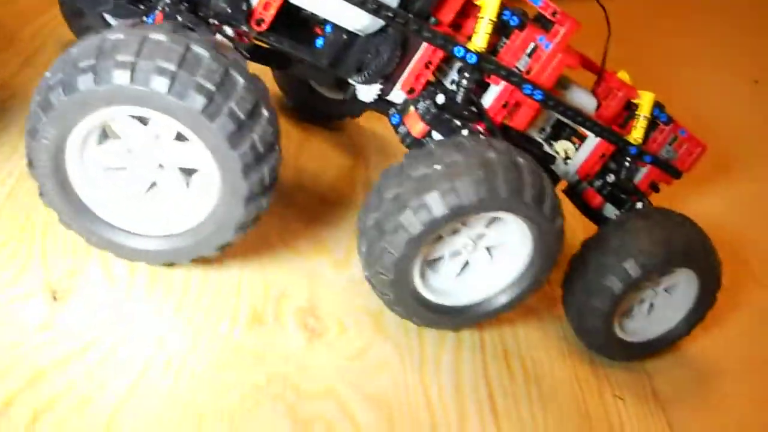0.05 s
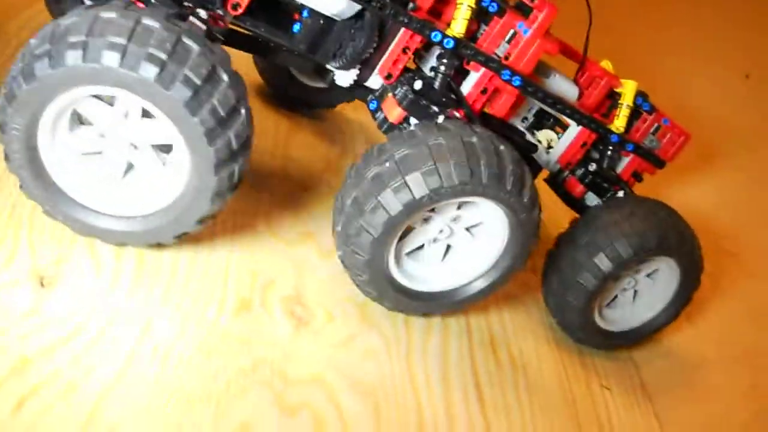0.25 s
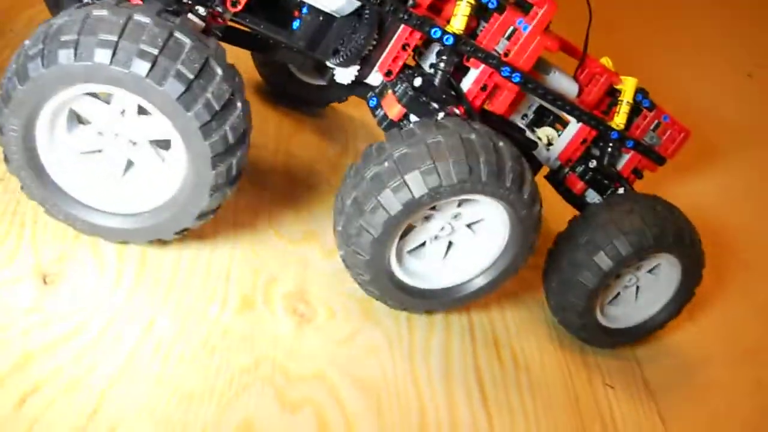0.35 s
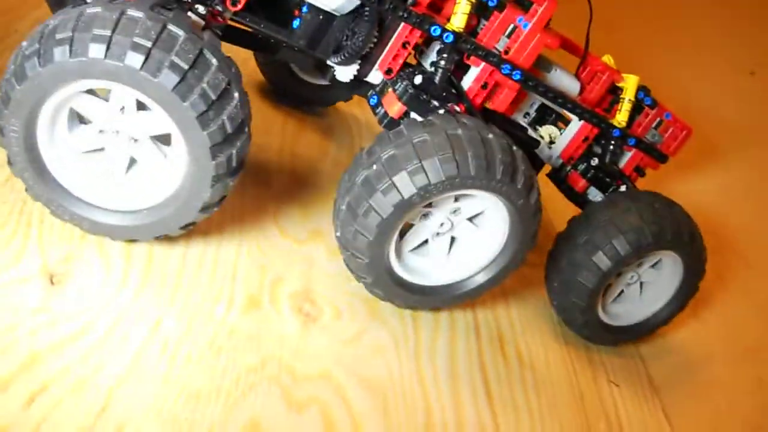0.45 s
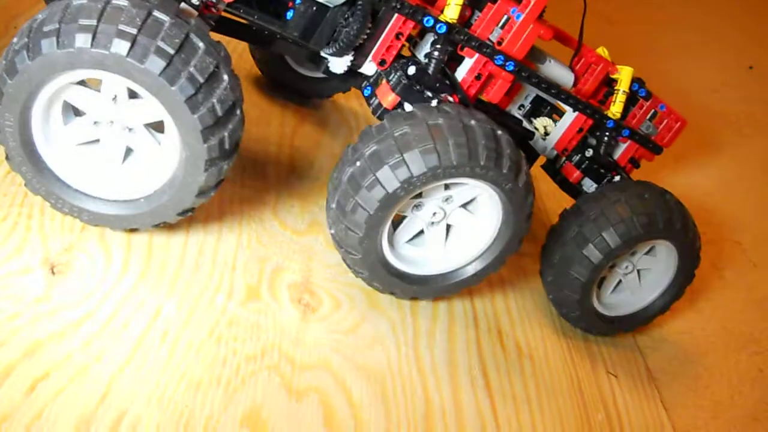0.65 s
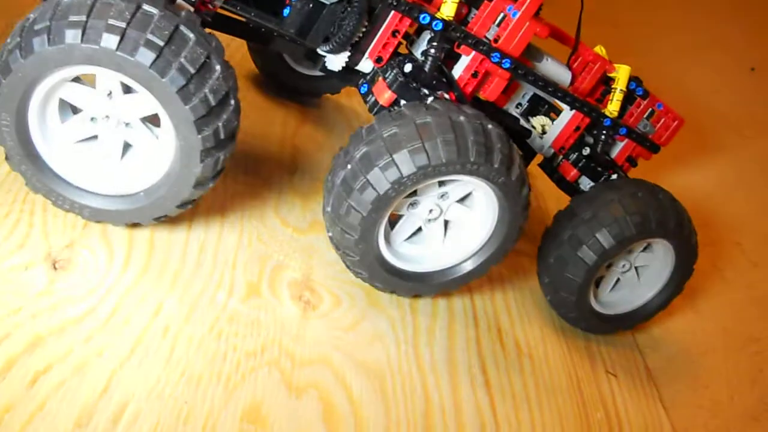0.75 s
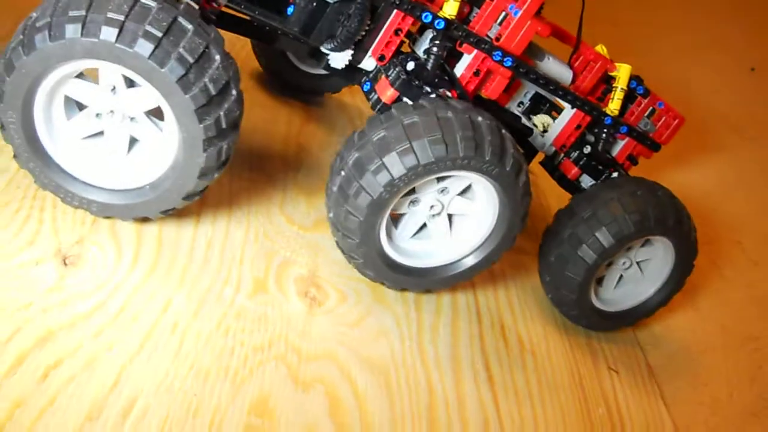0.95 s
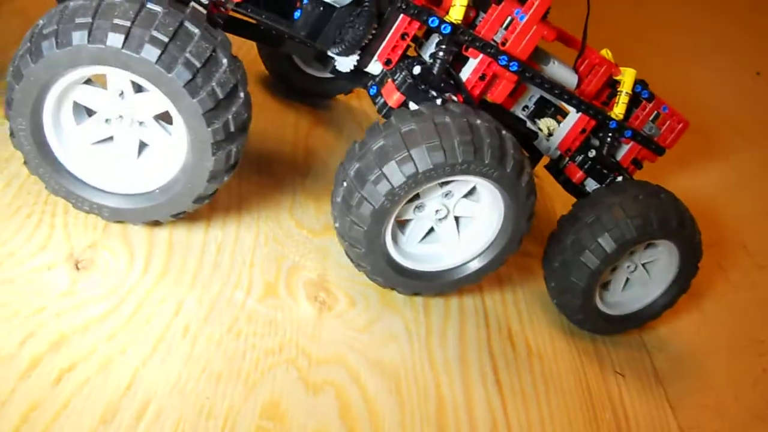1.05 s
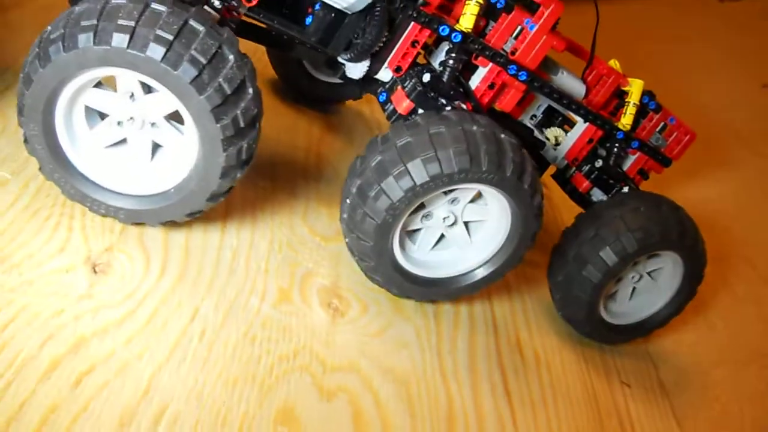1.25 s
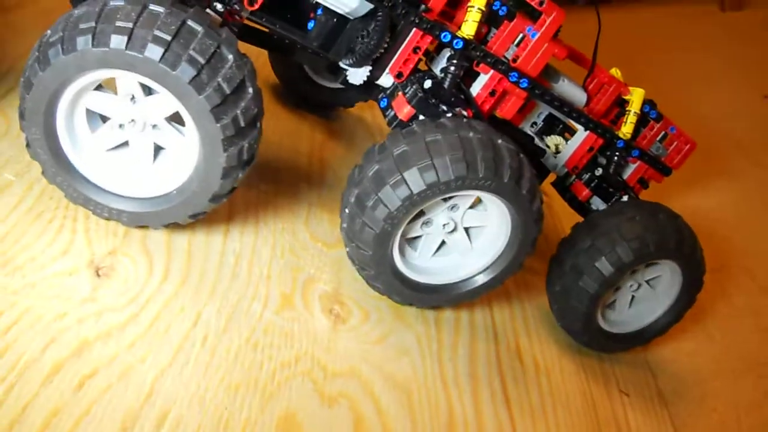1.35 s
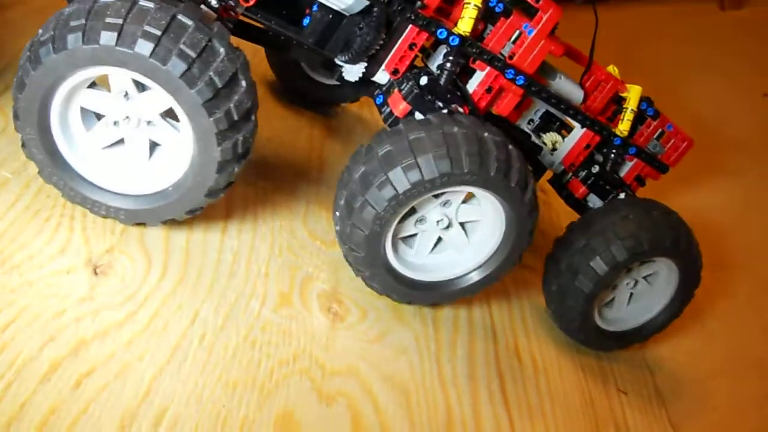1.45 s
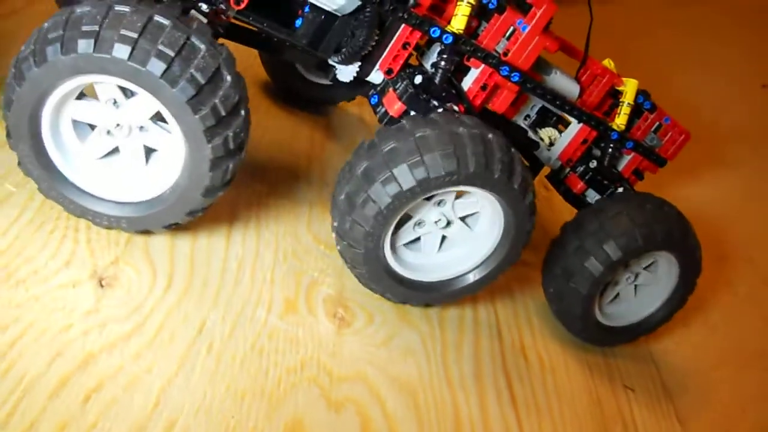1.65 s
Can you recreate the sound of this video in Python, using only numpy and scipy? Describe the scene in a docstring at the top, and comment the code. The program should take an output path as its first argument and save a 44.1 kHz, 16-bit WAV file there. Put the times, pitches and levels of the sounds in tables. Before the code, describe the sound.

Sharp, evenly spaced clicks come from a toy truck's slipping plastic gears, heard up close indoors. Its quieter motor whirs throughout, briefly slowing, while the chassis knocks and finally settles with a dull tap.

```python
"""A brief scuff and a whirring motor: a toy truck strains on a wooden floor, very close by.
Its shaft hums and its gears rub and tick. About five times a second a jammed plastic gear jumps
a tooth with a sharp snap, the loudest sound here, and the frame knocks as it shifts.
The rubber tyres thud and groan softly, and a small room answers each click over a faint rumble."""
import sys
import numpy as np
from scipy import signal
from scipy.fft import rfft, irfft
from scipy.io import wavfile
from scipy.ndimage import uniform_filter1d

SR = 44100
rng = np.random.default_rng(int(sys.argv[2]) if len(sys.argv) > 2 else 0)


def persist_wave(psi):
    """Save psi, clipped to +-1, as 16-bit WAV."""
    counts = np.round(np.clip(psi, -1, 1) * 32767).astype(np.int16)
    wavfile.write(sys.argv[1], SR, np.atleast_2d(counts).T)


N = 74970

# Levels are relative. A t60 is the time a sound takes to fade by 60 dB.
# gear teeth jumping: t/s, level/dB, pitch ratio, jolt level/dB
SNAPS = [(0.244, 1.5, 0.97, -2.5), (0.4511, 0.5, 0.96, 5), (0.6642, -0.5, 1.0, -19), (.8731, -0.5, 0.97, 6),
         (1.0607, -.5, 0.95, -4.5), (1.2675, -1.8, 1.0, 10.5)]
# the gear's ringing tones, before each snap's pitch ratio: f/Hz, level/dB, t60/s
GEAR_MODES = [(2843, -29.5, 0.029), (3724, -26.5, 0.022), (4480, -27, 0.0075), (5294, -5.5, 0.0056),
              (5473, -7, 0.01), (6017, -1, 0.0066), (6920, -14.5, 0.013), (8520, -2, 0.0036),
              (9150, -10.5, 0.0041)]
# the crack rattling on through the beams: f/Hz, level/dB
CRACK_SPECTRUM = [(100, -24.5), (400, -6.5), (900, -4.5), (1500, -11), (2200, -12), (3500, -12), (5500, 5),
                  (8000, 1), (10000, -3.5), (12500, -33.5)]
# the jolt each snap gives the chassis: f/Hz, level/dB
JOLT_SPECTRUM = [(60, 1), (300, -6), (600, -0.5), (1000, 4), (1700, -18), (2600, -29), (5000, -19),
                 (12000, -39)]
# the frame knocking: t/s, ring level/dB, clack level/dB
KNOCKS = [(.4102, -0.5, 3), (.9697, -5.5, -2.5), (1.4414, -4.5, -3.5)]
# the frame's ringing tones, before its pitch ratio: f/Hz, level/dB, t60/s
FRAME_MODES = [(486, -8.5, 0.019), (567, 6, 0.028), (661, -2.5, 0.051), (1373, -5, 0.031),
               (1702, 1.5, 0.015), (2120, -19, .012)]
# the clack of loose beams: f/Hz, level/dB
CLACK_SPECTRUM = [(150, -25.5), (600, -3.5), (1100, -8.5), (2400, -6.5), (3700, 0), (5500, 3.5), (7800, 4),
                  (10000, 2), (12500, -26)]
# the dull tones of the settling chassis: f/Hz, level/dB, t60/s
SETTLE_MODES = [(125, -2, 0.078), (307, -6, 0.04), (950, -4, 0.033), (1190, 0.5, 0.026), (1800, 0.5, .016),
                (2250, -6, .016)]
# turns of the motor shaft per second: t/s, f/Hz
SHAFT_SPEED = [(0, 84.5), (.17, 84.5), (.3, 79.55), (.45, 69.8), (.62, 63.4), (.70, 87.2), (1.0, 87.84),
               (1.42, 86.7), (1.48, 78.4), (1.56, 87.5), (1.7, 84.3)]
# how loud the motor runs: t/s, hum level/dB, whir level/dB
MOTOR_LEVELS = [(0, -67, -45.5), (.07, -54.5, -47.5), (.2, -55, -45.5), (.36, -57, -48.5), (.55, -61, -49),
                (.75, -58.5, -51), (1.0, -58, -50.5), (1.2, -59.5, -52), (1.4, -58, -51), (1.7, -59.5, -55)]
# the hum's tones at 1, 2, 3 and 4 times the shaft speed: level/dB
HUM_HARMONICS = [0.5, -11.5, -21.5, -20.5]
# the whir of rubbing teeth: f/Hz, level/dB
WHIR_SPECTRUM = [(250, -18.5), (340, -16.5), (470, -15.5), (570, -9), (830, -16.5), (1200, -12.5),
                 (1900, -22.5), (2200, -15.5), (2850, -19), (3500, -5), (4400, -11), (5900, -8), (6700, -3),
                 (7600, -3.5), (8600, -4), (10200, -5.5), (11000, -24.5), (12500, -40)]
# narrow bands where the running gears sing: f/Hz, width/Hz, starting level/dB, change/(dB per s)
GEAR_BANDS = [(3570, 150, -12.5, 0.5), (6710, 150, -7.5, -2.5), (6840, 360, -11.5, -4)]
# soft tyre thuds: t/s, level/dB, f/Hz, length/s
THUDS = [(0.187, -44, 69, 0.064), (0.632, -42.5, 75.3, 0.053), (1.113, -50.5, 66, 0.08),
         (1.469, -40.5, 23, 0.073)]
# rubber scuffing the floor: f/Hz, level/dB
SCUFF_SPECTRUM = [(100, -13), (330, 4), (600, 1), (1300, -5), (2500, -7), (6000, -3.5), (12000, -33)]
# rubber groaning on wood: t/s, level/dB, start f/Hz, end f/Hz, length/s, octave level/dB
GROANS = [(0.328, -56.5, 244.4, 200, .06, -25), (0.353, -58.5, 150, 205, 0.085, -22),
          (1.475, -59, 149.3, 171.2, 0.094, -2.5)]
# the room's echo: f/Hz, level/dB
ROOM_SPECTRUM = [(100, -0.5), (600, 2.5), (1500, 5.5), (3500, 4.5), (4500, -2), (5300, -5.5), (6000, -3.5),
                 (7000, -7), (9000, -6.5), (12000, -3.5)]
# the low background noise: f/Hz, level/dB
RUMBLE_SPECTRUM = [(20, 5.5), (60, 3), (120, -0.5), (250, -4.5), (500, -12.5), (2000, -20)]


def gear_snaps():
    """Each jumping tooth rings the gear briefly, rattles the beams and jolts the chassis."""
    out = 0
    for start, db, pitch, jolt_db in SNAPS:
        snap = undb(-6.5) * ring(start, GEAR_MODES, rise_s=0.00028, pitch=pitch)
        crack = undb(-18) * burst(start, CRACK_SPECTRUM, rise_s=0.00074, t60=0.016)
        jolt = undb(-33 + jolt_db) * burst(start, JOLT_SPECTRUM, rise_s=0.00028, t60=0.003)
        out += undb(db) * (snap + crack) + jolt
    return out


def frame_knocks():
    """Loose plastic beams clack and ring hollowly; at last the chassis settles with a dull tap."""
    out = 0
    for start, ring_db, clack_db in KNOCKS:
        out += undb(-32 + ring_db) * ring(start, FRAME_MODES, rise_s=0.0022, pitch=0.98)
        out += undb(-18.5 + clack_db) * burst(start, CLACK_SPECTRUM, rise_s=0.00084, t60=0.014)
    return out + undb(-40) * ring(start=1.4655, modes=SETTLE_MODES, rise_s=0.0022)


def motor():
    """The shaft hums, meshing teeth add a tone while the drive is stalled, and the gears whir."""
    t = np.arange(N) / SR
    speed = curve(SHAFT_SPEED) * (1 + 0.0079 * wander(25))
    angle = 2 * np.pi * np.cumsum(speed) / SR
    hum = np.sqrt(2) * sum(undb(db + 1.2 * wander(14.08)) * np.sin(k * angle)
                           for k, db in enumerate(HUM_HARMONICS, 1))
    stalled = uniform_filter1d(1. * ((t > 0.6) & (t < 1.46)), size=1500)  # soft on and off
    mesh = np.sqrt(2) * stalled * undb(-69 + 1.1 * wander(12.1)) * np.sin(2 * np.pi * 196.5 * t)
    whir = gear_whir(angle) * undb(curve(MOTOR_LEVELS, column=2))
    return hum * undb(curve(MOTOR_LEVELS)) + mesh + whir


def gear_whir(shaft_angle, ticks_per_s=900):
    """Teeth rub and tick, making a flickering whir that throbs once per turn of the shaft."""
    t = np.arange(N) / SR
    ticks = unit((rng.random(N) < ticks_per_s / SR) * rng.standard_normal(N))
    rub = unit(rng.standard_normal(N) + undb(-8) * ticks)
    whir = colour(rub, WHIR_SPECTRUM)
    for hz, width, db, db_per_s in GEAR_BANDS:
        band = signal.lfilter(*signal.iirpeak(hz, hz / width, fs=SR), rng.standard_normal(N))
        whir += undb(db + db_per_s * t) * unit(band)
    throb = 1 + 0.067 * np.sin(shaft_angle)
    flicker = undb(1.56 * wander(40.1))
    return whir * throb * flicker


def tyre_thuds():
    """The soft tyres bounce for a few cycles as the truck lurches."""
    out = 0
    for start, db, hz, length in THUDS:
        age = np.arange(N) / SR - start
        swell = np.sin(np.pi * np.clip(age / length, 0, 1))
        out += undb(db) * swell * np.sin(2 * np.pi * hz * age)
    return out


def tyre_rubs():
    """Rubber scuffs the floor, then sticks and slips in faint gliding groans."""
    out = undb(-43) * burst(0, SCUFF_SPECTRUM, rise_s=0.0014, t60=0.17)
    for start, db, start_hz, end_hz, length, octave_db in GROANS:
        progress = np.clip((np.arange(N) / SR - start) / length, 0, 1)
        glide_hz = start_hz + (end_hz - start_hz) * progress
        phase = 2 * np.pi * np.cumsum(glide_hz * (1 + 0.0273 * wander(90))) / SR
        tone = np.sin(phase) + undb(octave_db) * np.sin(2 * phase)
        out += undb(db) * np.sin(np.pi * progress) * tone
    return out


def room(x):
    """Floor and walls add a short, blurred echo to the sound."""
    tail = colour(rng.standard_normal(N) * fade(start=0.0028, rise_s=0.013, t60=0.19), ROOM_SPECTRUM)
    return x + undb(-14.5) * signal.fftconvolve(x, tail / np.linalg.norm(tail))[:N]


def rumble():
    """A faint, steady, low noise lies under everything."""
    return undb(-63) * colour(rng.standard_normal(N), RUMBLE_SPECTRUM)


def ring(start, modes, rise_s, pitch=1):
    """A struck part rings with fading tones, a little different on every blow."""
    age, out = np.arange(N) / SR - start, 0
    for (hz, db, t60), (detune, strength) in zip(modes, rng.standard_normal((len(modes), 2))):
        tone = np.sin(2 * np.pi * hz * pitch * (1 + 0.004 * detune) * age)
        out += undb(db + 0.7 * strength) * fade(start, rise_s, t60) * tone
    return out


def burst(start, spectrum, rise_s, t60):
    """A dying burst of filtered noise."""
    return colour(rng.choice([-1., 1.], N) * fade(start, rise_s, t60), spectrum)


def fade(start, rise_s, t60):
    """The loudness of a blow: a quick rise, then a smooth dying away."""
    age = np.maximum(np.arange(N) / SR - start, 0)
    return np.minimum(age / rise_s, 1) * np.exp(-np.log(1000) * age / t60)


def colour(x, spectrum):
    """Filter a sound to the shape of a spectrum; white noise keeps its overall power."""
    size = 4096
    hz, db = np.array(spectrum).T
    bin_hz = np.arange(size // 2 + 1) * SR / size
    gain = undb(np.interp(np.log(bin_hz + 1), np.log(hz), db))
    # fold the cepstrum so that the filter never sounds before the blow
    cepstrum = irfft(np.log(unit(gain)))
    cepstrum[1:size // 2] *= 2
    cepstrum[size // 2 + 1:] = 0
    return signal.fftconvolve(x, irfft(np.exp(rfft(cepstrum))))[:N]


def wander(rate_hz):
    """A random drift with a typical size of 1."""
    hold = int(SR / rate_hz)
    steps = np.repeat(rng.standard_normal(N // hold + 1), hold)
    return unit(uniform_filter1d(steps, hold)[:N])


def curve(rows, column=1):
    """One column of a table, joined by straight lines in time."""
    rows = np.array(rows)
    return np.interp(np.arange(N) / SR, rows[:, 0], rows[:, column])


def undb(db):
    """Turn decibels into a multiplier."""
    return 10 ** (np.asarray(db) / 20)


def unit(x):
    """Scale to an average power of 1."""
    return x / np.sqrt(np.mean(x ** 2))


def scene():
    """Clicks in the room over the motor, the tyres and the rumble, in one channel."""
    background = rumble()
    clicks = room(gear_snaps() + frame_knocks())
    return (clicks + motor() + tyre_thuds() + tyre_rubs() + background)[None]


def record(dry):
    """Cut the highest treble steeply, above 12300 Hz."""
    return signal.sosfilt(signal.ellip(8, .3, 70, 12300, fs=SR, output="sos"), dry)


dry = scene()
out = record(dry)
persist_wave(out)
```